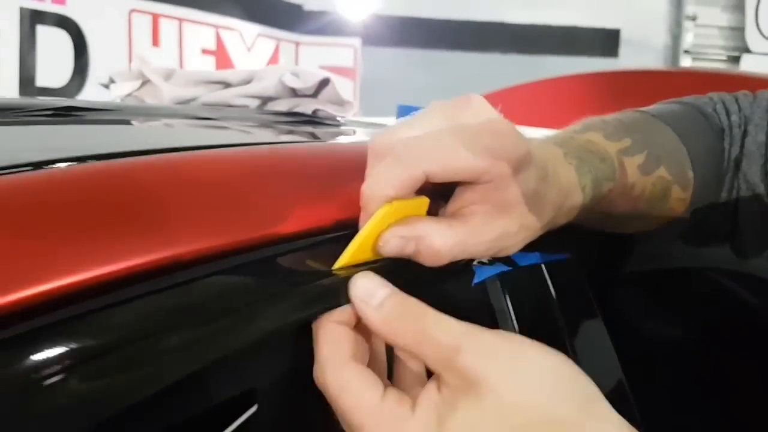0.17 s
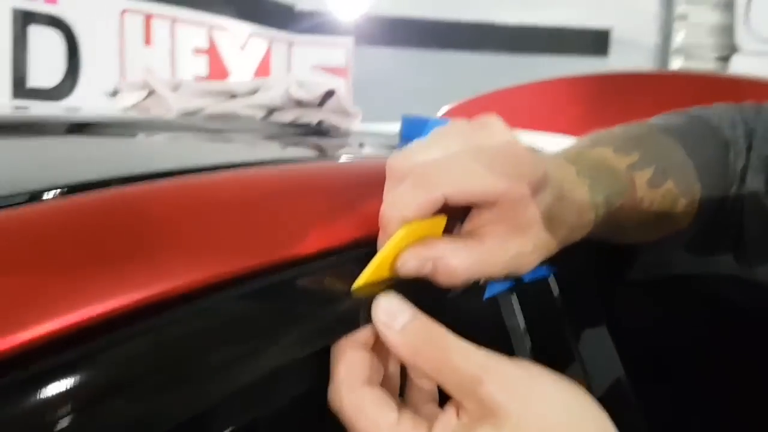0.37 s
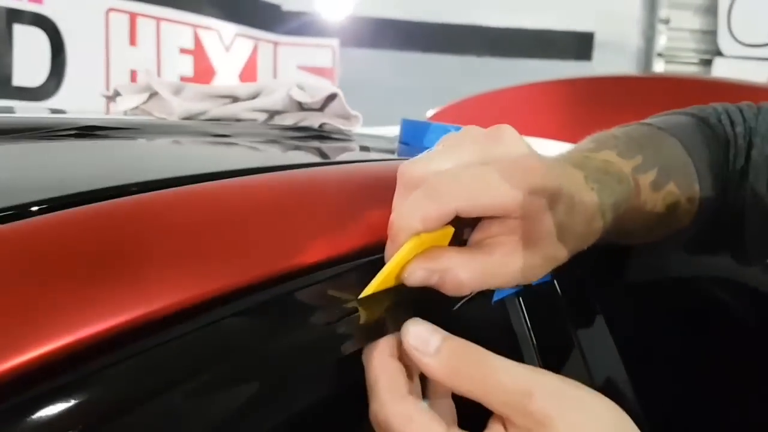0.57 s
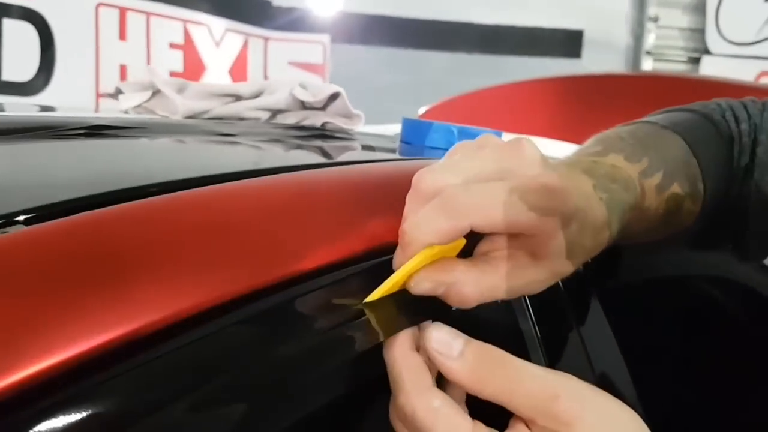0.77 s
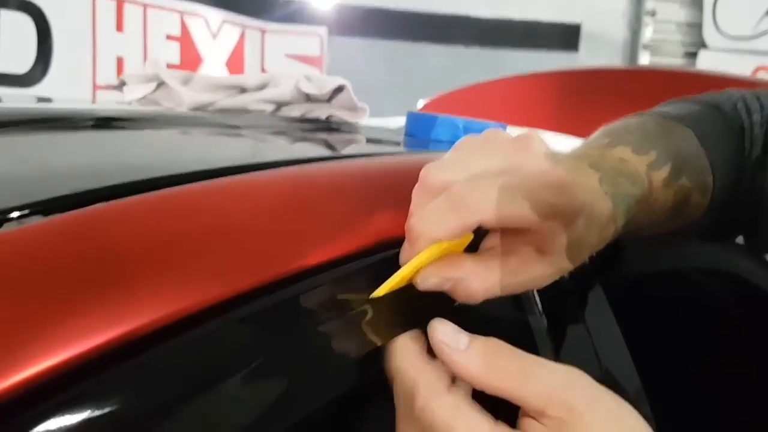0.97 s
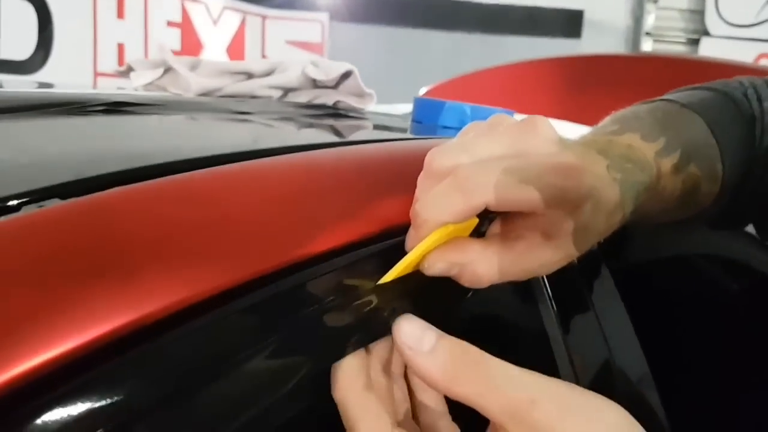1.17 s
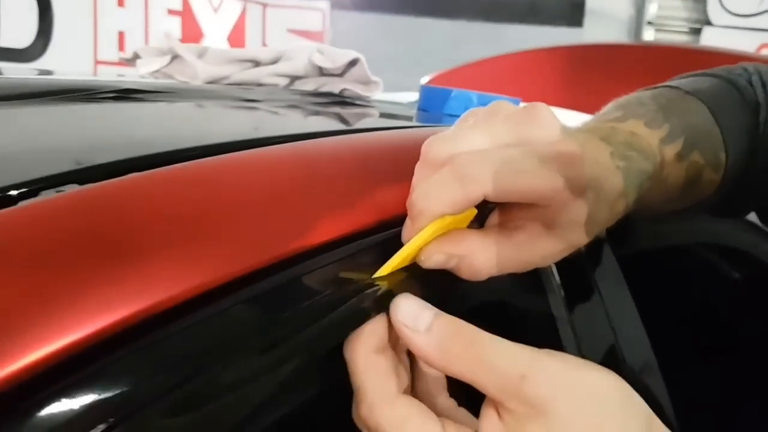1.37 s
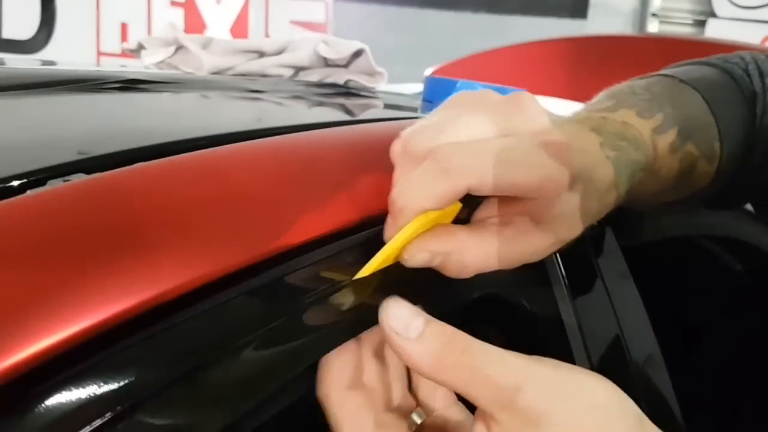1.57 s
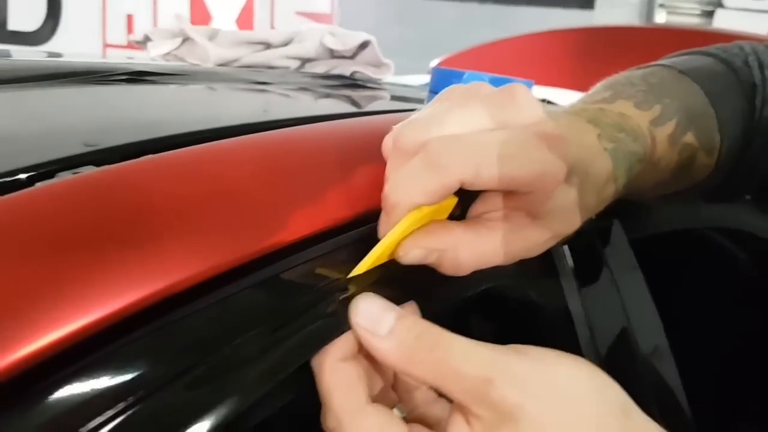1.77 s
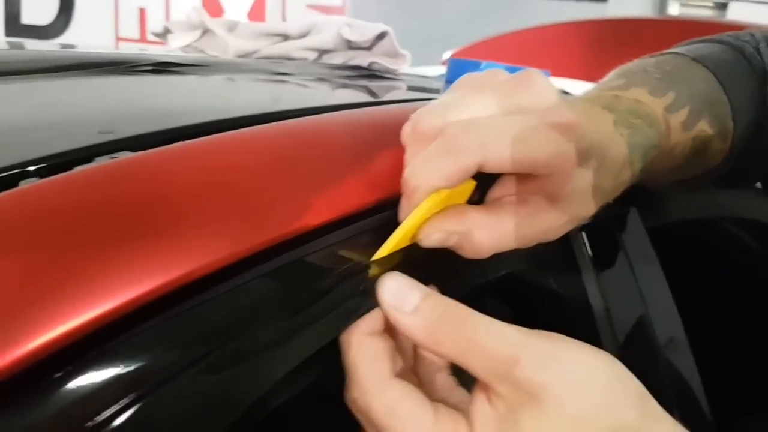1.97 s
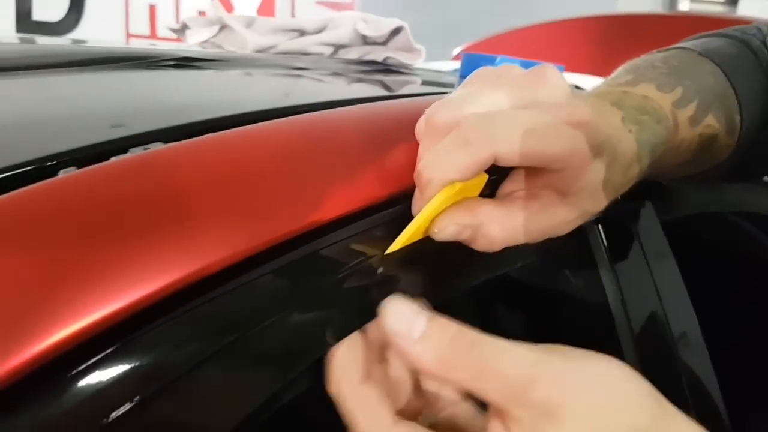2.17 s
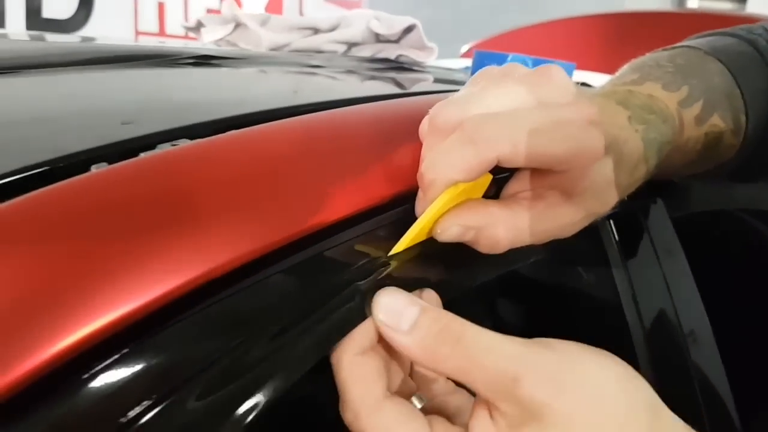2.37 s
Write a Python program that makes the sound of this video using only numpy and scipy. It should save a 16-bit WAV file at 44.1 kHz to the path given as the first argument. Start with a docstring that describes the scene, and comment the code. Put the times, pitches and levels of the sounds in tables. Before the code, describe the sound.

Plastic tool clicks on car trim, very close: a rapid, loud cluster of snaps at 0.05-0.15 s with scraping, crackly vinyl film, then a lighter tick at 0.34. Tiny creaks come around 0.85-1.0, a sharp snap at 1.11, and faint scattered ticks until 2.0. Soft clicks lead to firmer snaps at 2.2-2.27 and renewed rubbing. Short panel echoes, workshop reverberation, uneven low rumble and faint hiss.

```python
"""Vinyl film tucked under window trim

A plastic tuck tool and fingertips press vinyl film under a car's window trim, close to a camera in a workshop.
Snaps and ticks are short ringing modes, creaks are trains of them; the film is crackle and scrape in filtered noise.
Decaying noise tails give the echoes of car and hall; a swelling low rumble and a faint hiss lie beneath.
Tool and film reach the left port first; the tool's contacts ring longer in the right."""
import sys
import numpy as np
from scipy import signal
from scipy.fft import rfft, irfft, next_fast_len
from scipy.io import wavfile
from scipy.ndimage import uniform_filter1d

SR = 44100
rng = np.random.default_rng(int(sys.argv[2]) if len(sys.argv) > 2 else 0)


def generate_wav(signal):
    """Clip the signal to [-1, 1] and save it as 16-bit WAV at the path in sys.argv[1]."""
    frames = np.transpose(np.atleast_2d(signal))
    scaled = np.clip(frames, -1, 1) * 32767
    pcm = np.round(scaled).astype(np.int16)
    wavfile.write(sys.argv[1], SR, pcm)


N = 107030  # length in samples


def amp(db):
    """Turns dB into a linear gain."""
    return 10 ** (np.asarray(db) / 20)


def unit(x):
    """Scales a signal to rms 1."""
    return x / np.sqrt(np.mean(x ** 2) + 1e-20)


def along(points, hz):
    """Reads (frequency, value) points on a log-frequency axis."""
    f, v = np.transpose(points)
    return np.interp(np.log(hz + 1), np.log(f + 1), v)


def curve(rows):
    """Draws (time, value) points as one value per sample."""
    s, v = np.transpose(rows)
    return np.interp(np.arange(N) / SR, s, v)


def filtered(x, response):
    """Multiplies the spectrum of x by a complex response of frequency."""
    m = next_fast_len(N + SR // 2)
    spectrum = rfft(x, m) * response(np.fft.rfftfreq(m, 1 / SR))
    return irfft(spectrum, m)[..., :N]


def ports(pair, pan, lag_s):
    """Two microphone ports: a level difference by frequency, and a later arrival at the right port."""
    side = np.array([[.5], [-.5]])  # left, right
    delay_s = lag_s * (.5 - side)
    return filtered(pair, lambda hz: amp(side * along(pan, hz)) * np.exp(-2j * np.pi * hz * delay_s))


# Stereo width of the background: (frequency [Hz], left-right correlation [-1 to 1])
FLOOR_LIKENESS = [(60, 0.98), (130, 0.96), (290, 0.88), (640, 0.57), (1410, -0.18), (3100, 0.82),
                  (6820, -0.39), (15000, -0.022)]
# Balance of the background: (frequency [Hz], left over right [dB])
FLOOR_PAN = [(60, -1.5), (180, 0.0), (550, -2), (1650, -6), (4970, -9.5), (15000, 5)]


def diffuse_noise(spectrum, patchy_db):
    """Diffuse stereo noise, gently patchy in time and frequency, its ports partly alike in each band."""
    z = signal.stft(rng.standard_normal((2, N + 512)), nperseg=512)[2]
    patches = uniform_filter1d(rng.standard_normal(z.shape[1:]), 6, 0)
    patches = uniform_filter1d(patches, 12, 1)
    pair = signal.istft(z * amp(patchy_db * unit(patches)), nperseg=512)[1][:, :N]

    def mid_side(hz):
        # this angle splits the power so that left and right have the wanted correlation
        turn = np.arccos(np.clip(along(FLOOR_LIKENESS, hz), -1, 1)) / 2
        return amp(along(spectrum, hz)) * [np.cos(turn), np.sin(turn)]

    mid, side = filtered(pair, mid_side)
    return ports(unit(np.array([mid + side, mid - side])), FLOOR_PAN, 0)


# Tone of the low rumble: (frequency [Hz], relative level [dB])
RUMBLE_TONE = [(15, -53), (24, -15), (40, -11), (52, -12.5), (70, 2.5), (86, -4), (103, -1.5), (122, -5.5),
               (150, -1), (200, -8.5), (250, -8), (290, -14.5), (420, -16.5), (600, -26.5), (800, -40),
               (1300, -120)]
# Swell of the rumble: (time [s], level of its deep part [dB], level of its upper part [dB])
RUMBLE_SWELL = [(0.0, -50, -54.5), (0.17, -51.5, -53), (0.28, -56, -52.5), (0.51, -58.5, -59),
                (0.78, -60, -60), (1.03, -59.5, -59), (1.2, -52, -59.5), (1.4, -54, -59),
                (1.6, -55.5, -61.5), (1.83, -59, -56.5), (1.99, -57.5, -62), (2.3, -58.5, -54.5),
                (2.43, -60, -58)]
# Tone of the hiss: (frequency [Hz], relative level [dB])
HISS_TONE = [(180, -7.5), (300, -6.5), (915, -4), (1060, -8), (1210, -7), (1970, -26), (2520, -18),
             (3190, -22), (9500, -29.5), (12000, -24.5), (14300, -25.5), (14900, -45), (16000, -61.5)]
SPLIT_HZ, HISS_DB = 121.5, -64.5  # border of deep and upper rumble; hiss before its left-right balance


def background():
    """Low workshop rumble in two bands that swell apart, and a steady hiss, both of filtered noise."""
    s, deep_db, upper_db = np.transpose(RUMBLE_SWELL)
    rumble = diffuse_noise(RUMBLE_TONE, patchy_db=0.3)
    deep = filtered(rumble, lambda hz: 1 / (1 + (hz / SPLIT_HZ) ** 8))
    upper = rumble - deep
    deep_swell = amp(curve(np.transpose([s, deep_db]))) * unit(deep)
    upper_swell = amp(curve(np.transpose([s, upper_db]))) * unit(upper)
    hiss = amp(HISS_DB) * diffuse_noise(HISS_TONE, patchy_db=0.5)
    return deep_swell + upper_swell + hiss


def tail(t60, seconds):
    """A stereo noise tail whose bands die at their own speeds, scaled to energy 1 in the left port."""
    hz, t, z = signal.stft(rng.standard_normal((2, int(seconds * SR))), SR, nperseg=128)
    decay = amp(-60 * t / t60(hz)[:, None])
    out = signal.istft(z * decay, SR, nperseg=128)[1]
    return out / np.linalg.norm(out[0])


# Decay of the hall: (frequency [Hz], t60 [s])
HALL_T60 = [(200, 0.48), (1000, 0.98), (2200, 0.94), (3500, 0.78), (6000, 0.85), (9500, 0.15), (13000, 0.4)]
# Colour of echoes and hall together: (frequency [Hz], gain [dB])
ANSWER_TONE = [(300, -8), (800, 4), (2200, 2.5), (3300, -1.5), (4500, -5.5), (6000, -6.5), (9500, -4),
               (13000, 1.5)]
HALL_DB, NEAR_DB, NEAR_T60_S = -11, -9.5, 0.035  # hall tail and panel echoes, before the colour


def workshop(near):
    """Quick echoes off the car body and the long answer of the hall: noise tails convolved with the left port."""
    wet, step = np.zeros((2, N + 2 * SR)), SR * 3 // 10
    for start in range(0, N, step):  # fresh tails for every 0.3 s of sound
        hall = amp(HALL_DB) * tail(lambda hz: along(HALL_T60, hz), 0.94)
        panels = amp(NEAR_DB) * tail(lambda hz: NEAR_T60_S + 0 * hz, .1)
        hall[:, :panels.shape[1]] += panels
        answer = signal.fftconvolve(near[:1, start:start + step], hall, axes=1)
        begin = start + SR // 500  # 2 ms behind the direct sound
        wet[:, begin:begin + answer.shape[1]] += answer
    return filtered(wet[:, :N], lambda hz: amp(along(ANSWER_TONE, hz)))


# Loudness of the continuous rubbing: (time [s], level before the left-right balance [dB])
RUB_LEVEL = [(0.0, -51), (0.23, -53.5), (0.45, -67), (0.64, -66), (0.94, -69), (1.13, -69.5), (1.25, -58.5),
             (1.33, -63.5), (1.88, -62.5), (2.13, -70.5), (2.27, -59), (2.43, -56.5)]
# Tone of the rubbed film: (frequency [Hz], relative level [dB])
FILM_TONE = [(240, -42), (400, -0.5), (753, -4), (1820, 2), (2300, 1), (4580, -7), (5690, -9.5),
             (8630, -22), (9800, -26.5), (12000, -20), (14300, -28), (14800, -45), (16000, -71)]
# Short strokes of the tool's edge: (start [s], length [s], level before the tilt [dB], treble tilt [dB per octave])
STROKES = [(0.061, 0.05, -44, 3), (0.331, 0.022, -51.5, 1), (0.616, 0.012, -74.5, 10),
           (1.091, 0.04, -53.5, 2), (1.134, 0.042, -53.5, 3), (1.405, 0.099, -72.5, 9.5),
           (1.428, 0.13, -72, -6.5), (1.508, 0.037, -57, 5), (1.711, 0.012, -44, 3),
           (1.786, 0.04, -60.5, -4.5), (2.188, 0.035, -46, 1.5), (2.236, 0.018, -49.5, 1),
           (2.356, 0.056, -65, 3)]
# Balance of the rubbing: (frequency [Hz], left over right [dB])
RUB_PAN = [(400, 6.5), (1000, -3), (1800, -10), (2400, -4), (4500, -9), (8000, 7), (13000, 4.5)]
CRACKLES_PER_S, CRACKLE_SPREAD_DB = 700, 4  # mean rate; spread of crackle sizes
SMOOTH_SHARE = 1  # rms of the scrape against the crackle
STROKE_EDGE_S, TILT_HZ = 0.012, 2940  # fade at each end of a stroke; reference of its tilt
RIGHT_LAG_S = .00011  # later arrival of tool and film at the right port


def film_rub():
    """Film sliding under fingers and tool: crackles of uneven size over a smooth scrape, plus the strokes."""
    when, size, sign = rng.random(N), rng.exponential(size=N), rng.standard_normal(size=N)
    happens = when < CRACKLES_PER_S / SR
    crackle = unit(happens * amp(CRACKLE_SPREAD_DB * np.minimum(size, 3)) * np.sign(sign))
    scrape = SMOOTH_SHARE * rng.standard_normal((2, N))
    film = unit(filtered(crackle + scrape, lambda hz: amp(along(FILM_TONE, hz))))
    out, t = film * amp(curve(RUB_LEVEL)), np.arange(N) / SR
    for s, length, db, tilt_db in STROKES:
        gate = np.clip(np.minimum(t - s, s + length - t) / STROKE_EDGE_S + .5, 0, 1)
        # the added 200 Hz flattens the tilt in the bass
        out += amp(db) * filtered(film * gate, lambda hz: amp(tilt_db * np.log2((hz + 200) / TILT_HZ)))
    return ports(out, RUB_PAN, RIGHT_LAG_S)


# Stick-slip of the edge along the seal:
# (start [s], length [s], rate [slips per s], unevenness of timing [0-1], middle level [dB])
CREAKS = [(.851, .052, 165, .15, -51), (.93, .024, 170, .5, -57), (.988, .02, 200, .3, -54),
          (1.405, .045, 170, .6, -54), (1.5, .06, 220, .7, -54), (2.375, .04, 250, .7, -52)]
# Mode mix of a slip: (thump [dB], body [dB], snap [dB], edge [dB], treble [dB])
CREAK_MIX = (-21, -22, -16.5, -10.5, -18)
CREAK_PAN_DB = -4.5  # left over right
MOST_SLIPS = 14  # in one creak


def creak_slips():
    """The edge sticks and slips along the seal: one contact row a slip, silent past the creak's end."""
    rows = []
    for s, length, rate, uneven, db in CREAKS:
        shift, size = rng.uniform(-0.37, 0.33, size=(2, MOST_SLIPS))
        times = (np.arange(MOST_SLIPS) + uneven * shift) / rate
        levels_db = np.where(times < length, db + 6 * size, -np.inf)
        rows += [(s + u, v, *CREAK_MIX, CREAK_PAN_DB) for u, v in zip(times, levels_db)]
    return rows


# Snaps and ticks of the tool: (first touch [s], level [dB], then the share of each mode family:
# thump [dB], body [dB], snap [dB], edge [dB], treble [dB]; left over right [dB])
CLICKS = [(0.0408, -42, -28, -6.5, -11.5, -17, -26, -7), (0.0488, -41, -33, -14, 4, -22, -24, 1),
          (0.0651, -44, -19, 6, -6, -9, -12, 4), (0.0766, -12.5, -23, -10.5, -15, -19.5, -26, -1.5),
          (0.0897, -11.5, -23.5, -15.5, -6, -12, -24, -1.5), (0.1048, -22, -15.5, -8, -13, -22, -39, -3.5),
          (0.1132, -31.5, -12, -10, -14, -27, -37, -2), (0.12, -36, -15, -13, -9, -19, -33, -4),
          (0.1255, -33, -17, -9, -19, -22, -30, 6), (0.1388, -28, -23, -12, -8, -13, -24, -3.5),
          (0.3302, -51, -31, -13, -7, -8, 3.5, -18), (0.3356, -42, -44, -11, -20, -29, -13, -2.5),
          (0.3363, -24, -39, -11, -6.5, -20, -20.5, -4), (0.3434, -38.5, -19, -1, -28, -22, -8, -1),
          (0.619, -47, -20, -14, -30, -13, -16, -12), (0.7197, -39.5, -21.5, -11.5, -8, -12, -10, -3.5),
          (0.7541, -41.5, -32, -34, -14.5, -14, -21, -6.5), (0.9605, -52, -30, -24, -16, -9, -14, -5),
          (0.972, -54.5, -33, -31, -12, -6, -25, -10), (1.053, -58, -25.5, -23, -10, -4, -18, -10),
          (1.0766, -42, -27, -32, -12, -12, -33, -6), (1.088, -45.5, -24, -33, -9, -14, -26, -15),
          (1.0924, -45.5, -26, -11.5, -8, -20, -21, -12), (1.1043, -51, -7, 1, 7, -2, -13, 4),
          (1.1099, -28, -40, -19, -6, -19, -17, -3), (1.1107, -16, -22.5, -17, -10, -14, -27.5, -6.5),
          (1.127, -48, -9, -30, -16.5, -12, -27, -9), (1.1358, -36, -18.5, -25, -7, -18, -28, -2),
          (1.1441, -43, -10.5, -23, 0, -13, -15, -2), (1.155, -28, -20.5, -24, -11, -9, -16.5, -7),
          (1.225, -50, -23, -26, -11, -9, -12, 4), (1.2379, -58, -28, -27, -16, -11, -20, -6.5),
          (1.266, -46.5, -13, -26, -15, -13, -18, -10), (1.277, -48, -16, -18, -10, -12, -22, -10),
          (1.2938, -39.5, -26, -14, -18, -12, -17, -6), (1.3248, -47, -13, -28, -25, -9, -13, -6),
          (1.3468, -53, -31.5, -13, -9, -6, -15, -9.5), (1.3646, -33, -30, -23, -22, -21.5, -20.5, -4.5),
          (1.3815, -48, -18, -14, -27, -10, -19, -12), (1.3973, -46.5, -20, -27, -18, -8, -10, -5),
          (1.452, -41, -15, -24, -13, -8, -15, -4), (1.5234, -40, -12, -17, -17, -15, -28, -7),
          (1.6361, -35.5, -15.5, -10.5, -15, -22, -22, -2.5), (1.6693, -42, -27, -18, -17, -17, -21, -5),
          (1.713, -32, -14, -12, -34, -14.5, -23.5, -1.5), (1.7241, -44, -7, -8, -30, -28, -28, -7),
          (1.7838, -49, -11, -16, -11, -12, -21, -10), (1.8002, -48.5, -13, -6, -14, -19, -19, -12),
          (1.9131, -46, -17, -3, -27, -35, -37, -7.5), (1.9226, -40.5, -19, -8, -23, -25, -57, -8),
          (2.0385, -36, -24, -5, -12, -17, -24, 0), (2.0499, -28.5, -25.5, -13, -15, -9, -23, -1.5),
          (2.0668, -33, -24, -7.5, -17, -25, -24, -5), (2.0869, -33, -25, -10.5, -20.5, -32, -29, -7),
          (2.099, -48, -15, -20, -18, -15, -17, -5), (2.163, -49, -27, -13, -5, -7, -30, -7),
          (2.1767, -39, -42, -11, -7, -23, -20, -1), (2.183, -53, -39, -10, -10, -22, -28, -6),
          (2.1914, -48, -32, -14, -24.5, -21, -12, -5), (2.2024, -38, -35, -7.5, 3, -19, -19, -3),
          (2.1968, -45, -35, -14, -8, -16, -12, -11), (2.207, -16, -24.5, -12.5, -14.5, -26, -23.5, -7),
          (2.2145, -44.5, -13, -18, -19, -21, -9, -11), (2.2472, -39, -16, -12, -16, -22, -14, -11),
          (2.2498, -61, -10, -4, -10.5, -10, -8, -7), (2.269, -23.5, -19.5, -10, -15.5, -15.5, -20.5, -3.5),
          (2.3689, -47, -12, -8, -25, -13, -28, -15), (2.3969, -43, -17, -4, -21, -15, -28, -10)]
# Modes of tool and trim, a family each: (frequency [Hz], relative level [dB], t60 in the right port [s])
THUMP = [(235, 9.5, 0.03), (347, 8.5, 0.03), (541, 12, 0.017), (967, 16.5, 0.0073)]
BODY = [(1404, 8.6, 0.0081), (1887, 5.66, 0.016), (2390, 7.8, 0.013)]
SNAP = [(2810, 17, 0.0039), (3256, 15.5, 0.0076), (3556, 17, 0.005), (4170, 19.3, 0.0034)]
EDGE = [(4280, 19.4, 0.0025), (4700, 17, 0.0067), (5710, 16, 0.0046), (6770, 7.6, 0.0048)]
TREBLE = [(7940, 24.3, 0.0018), (10600, 17.8, 0.0029), (12270, 19.1, 0.0035), (13930, 16.5, 0.0033)]
# Balance added to each contact's own: (frequency [Hz], left over right [dB])
CLICK_PAN = [(300, 9), (1000, 0), (1800, -6), (2400, 4), (3600, -2.5), (4600, -1), (6500, 11.5), (9000, 16),
             (13000, 4.5)]
LEFT_RING = 0.74  # left t60 over right t60
SCATTER_DB, DETUNE, PORT_DETUNE = 1.2, .015, .015  # chance in mode level and, as a share, in pitch
RISE_S, SKEW = .00035, 0.3  # attack time constant; chance in starting phase, radians
TOUCH_DB, SETTLE_S = -25, .0011  # light touch; its lead before the snap
REBOUND_DB, REBOUND_S = -15.5, 0.0018  # rebound; its typical time after the snap
CLICK_LOW_HZ = 161  # bass roll-off


def tool_contacts(rows):
    """Every contact rings the same modes, slightly retuned, in its own mix: touch, snap, rebound."""
    families = [THUMP, BODY, SNAP, EDGE, TREBLE]
    hz, level, t60 = np.transpose(sum(families, []))[..., None]
    which = np.repeat(np.arange(len(families)), [len(f) for f in families])
    facing = (-1.) ** np.arange(len(which))[:, None]  # neighbouring modes swing in opposite senses
    out, t = np.zeros((2, N + SR)), np.arange(SR // 40) / SR
    attack = (1 - np.exp(-t / RISE_S)) ** 2
    chance = rng.standard_normal((len(rows), 5, len(which), 1))
    for (s, db, *shares, pan_db), (wild, tune, late, *own) in zip(rows, chance):
        gain = amp(db + np.array(shares)[which, None] + level + SCATTER_DB * wild)
        rebound_s = SETTLE_S + REBOUND_S * np.exp(0.33 * late[0, 0])
        stages = [(0, TOUCH_DB), (SETTLE_S, 0), (rebound_s, REBOUND_DB)]
        for port, ring in enumerate([LEFT_RING, 1]):
            pitch = hz * (1 + DETUNE * tune + PORT_DETUNE * own[port])
            waves = np.sin(2 * np.pi * pitch * (t - RISE_S) + SKEW * own[port])
            shape = gain * amp(-60 * t / (ring * t60)) * attack
            sound = (facing * waves * shape).sum(0) * amp(pan_db * (.5 - port))
            for after, stage_db in stages:
                begin = round((s + after) * SR)
                out[port, begin:begin + len(t)] += amp(stage_db) * sound
    thin = filtered(out[:, :N], lambda f: (1j * f / (CLICK_LOW_HZ + 1j * f)) ** 2)
    return ports(thin, CLICK_PAN, RIGHT_LAG_S)


def scene():
    """Tool and film close by, their answer from car and hall, and the background beneath."""
    steady = background()
    near = film_rub() + tool_contacts(CLICKS) + tool_contacts(creak_slips())
    return near + workshop(near) + steady


TOP_HZ = 16500


def record(dry):
    """The camera keeps nothing from its band limit up."""
    return filtered(dry, lambda hz: hz < TOP_HZ)


dry = scene()
out = record(dry)
generate_wav(out)
```